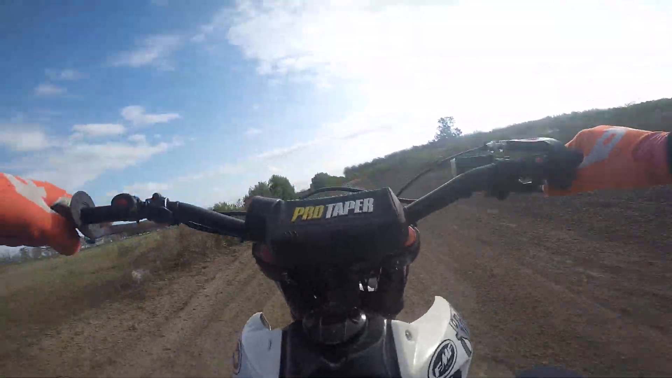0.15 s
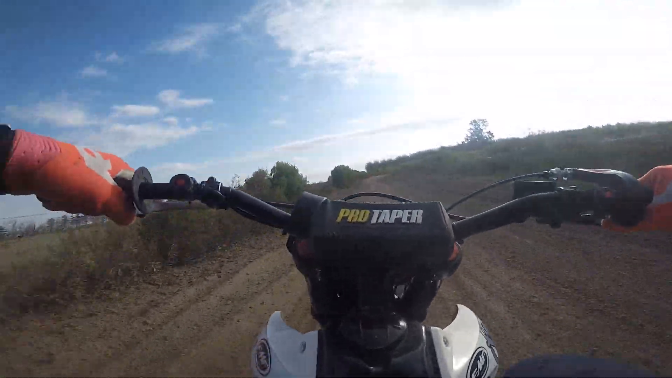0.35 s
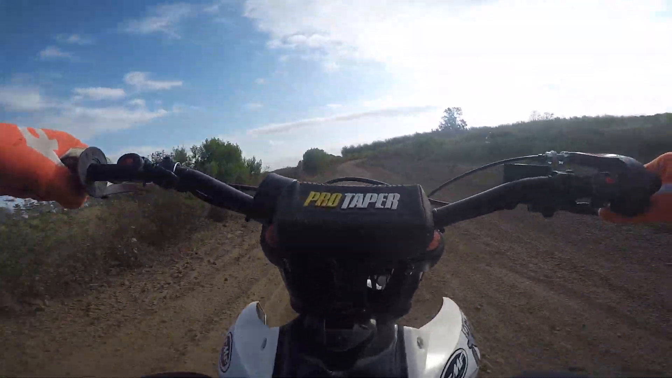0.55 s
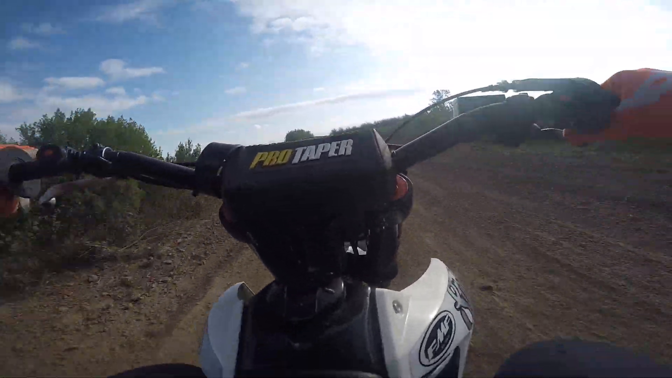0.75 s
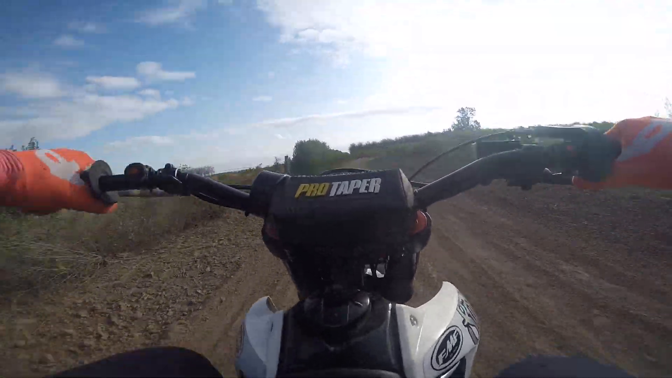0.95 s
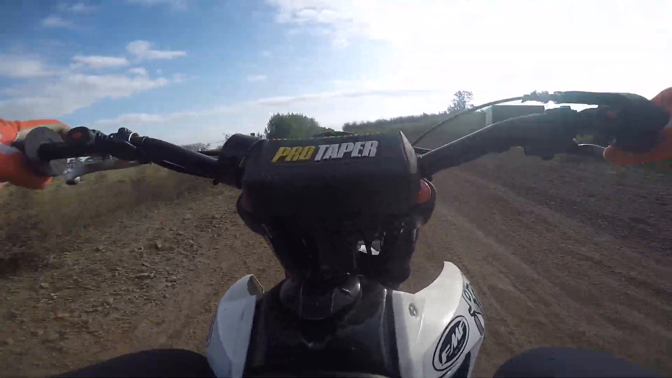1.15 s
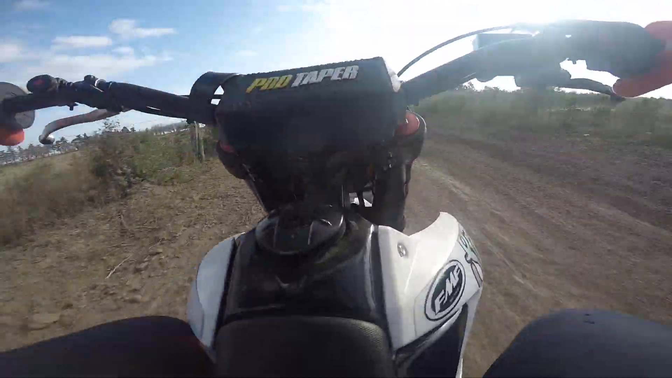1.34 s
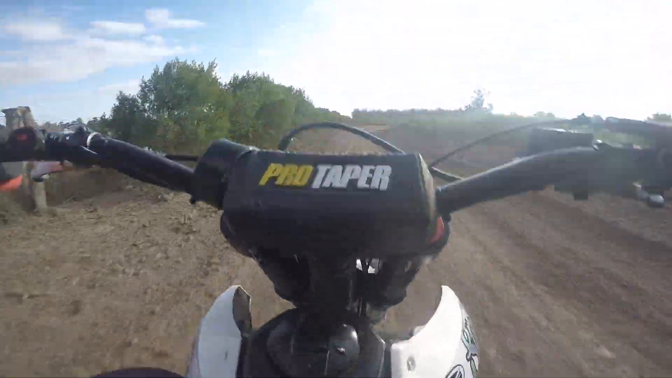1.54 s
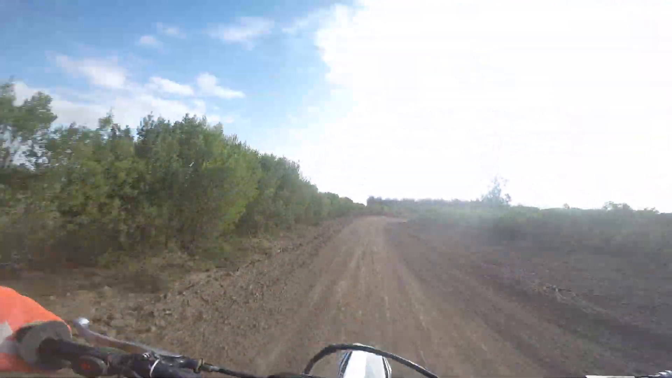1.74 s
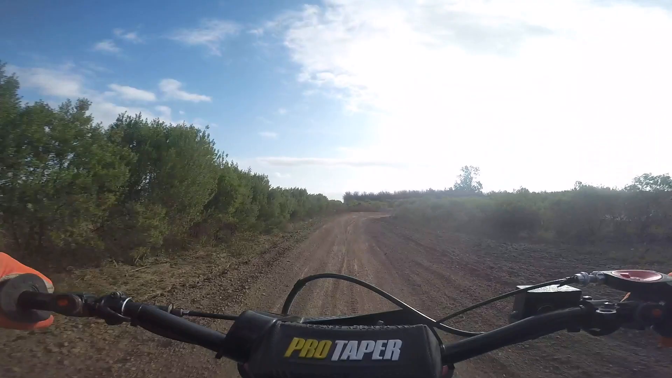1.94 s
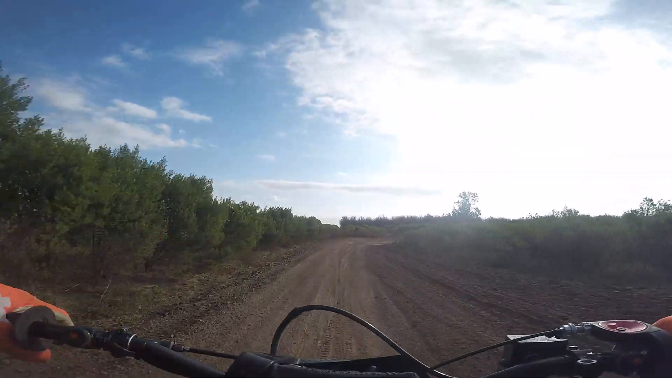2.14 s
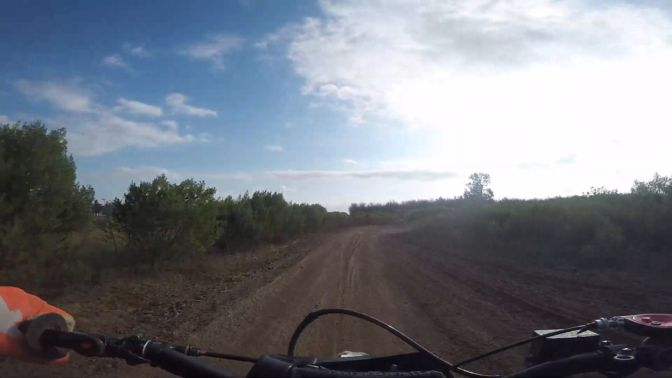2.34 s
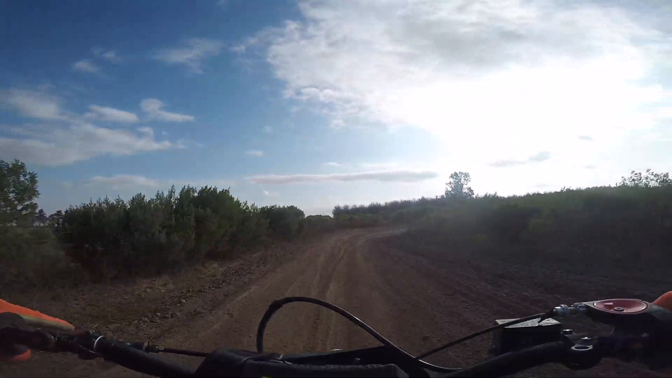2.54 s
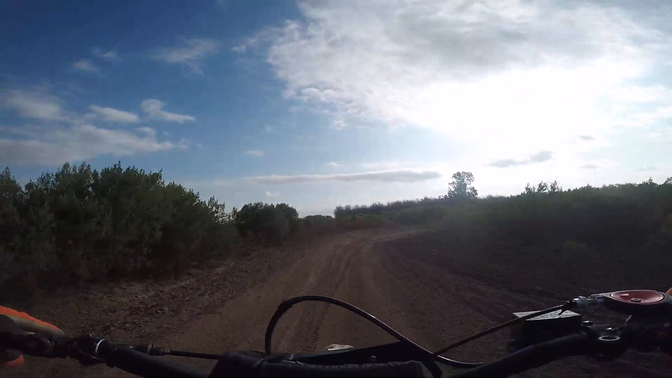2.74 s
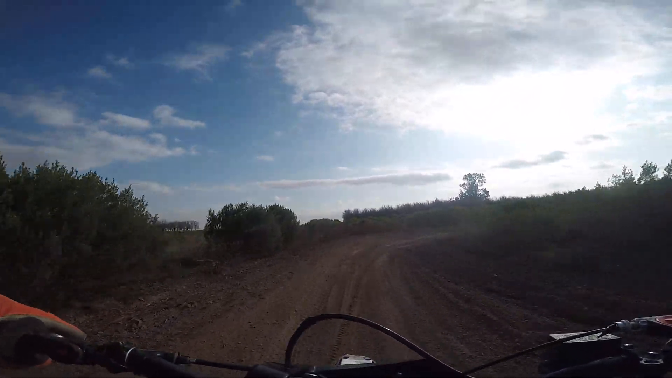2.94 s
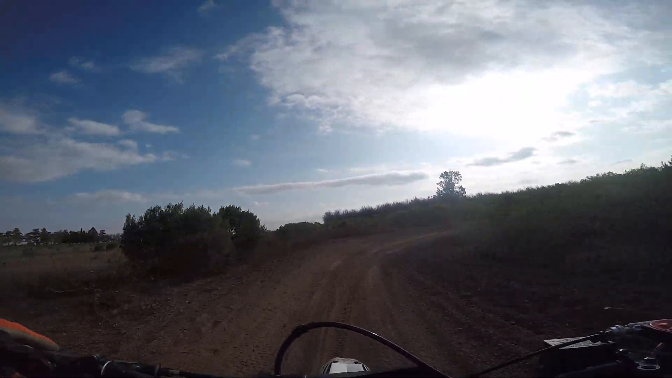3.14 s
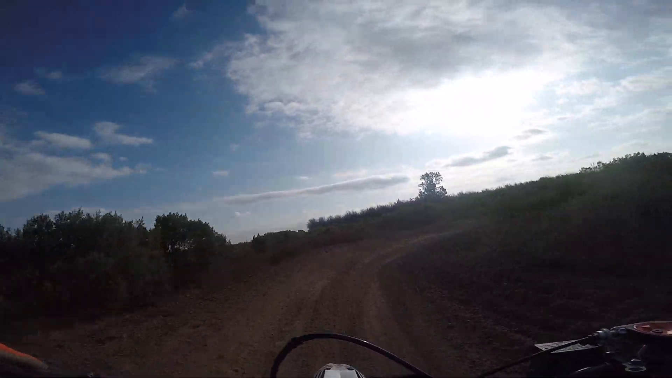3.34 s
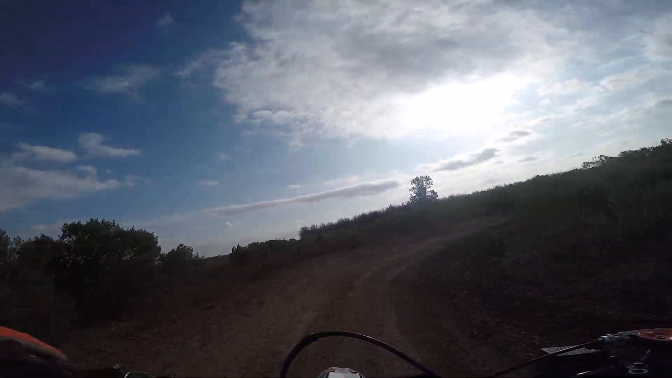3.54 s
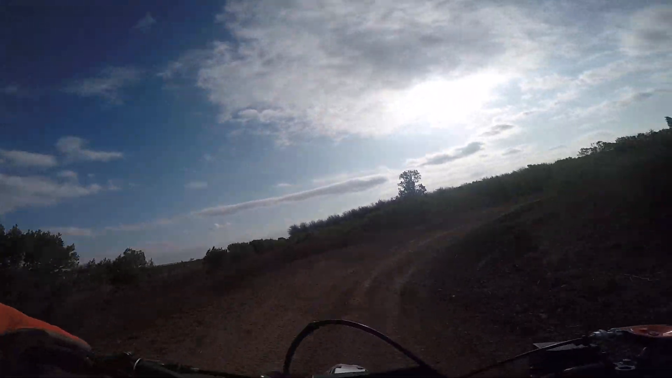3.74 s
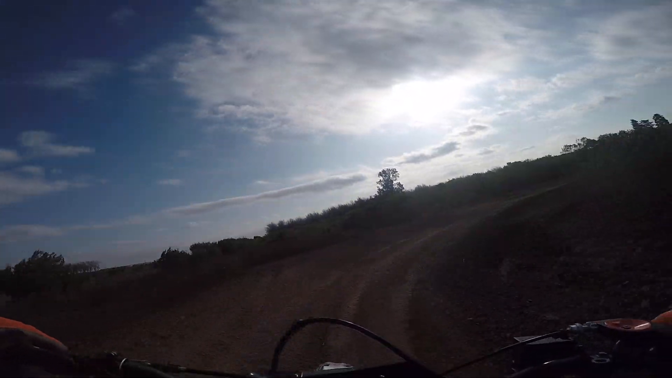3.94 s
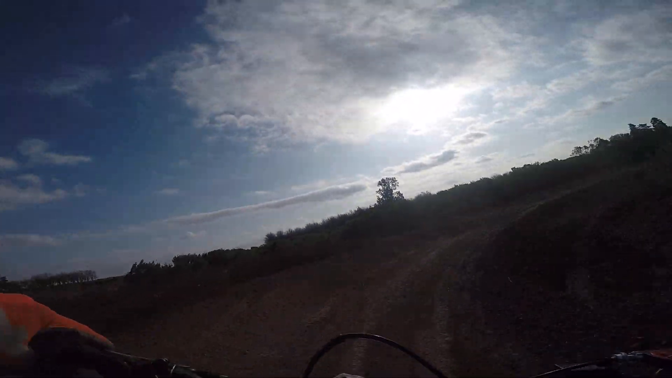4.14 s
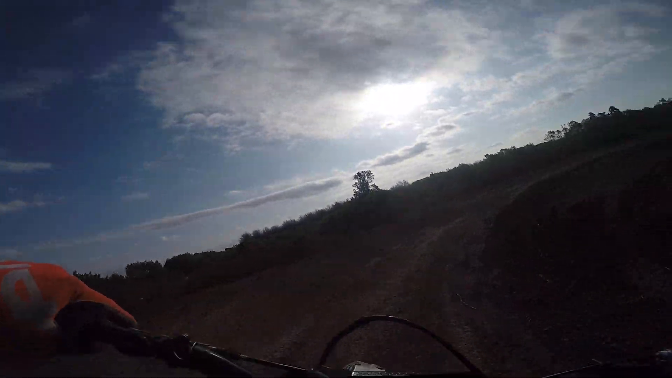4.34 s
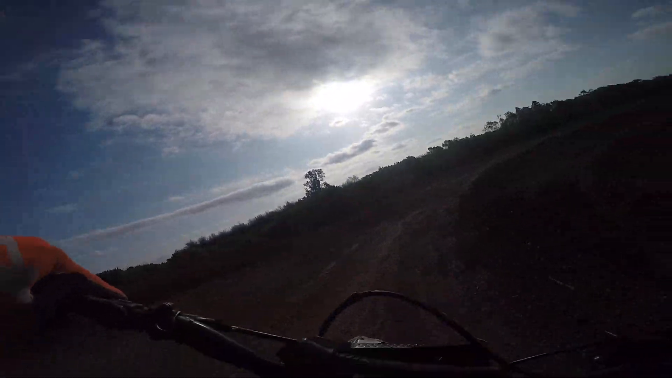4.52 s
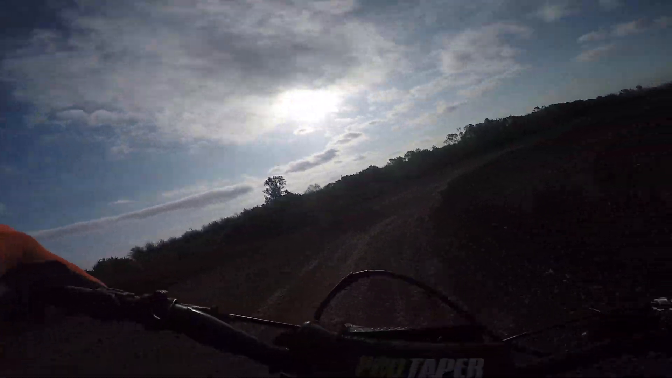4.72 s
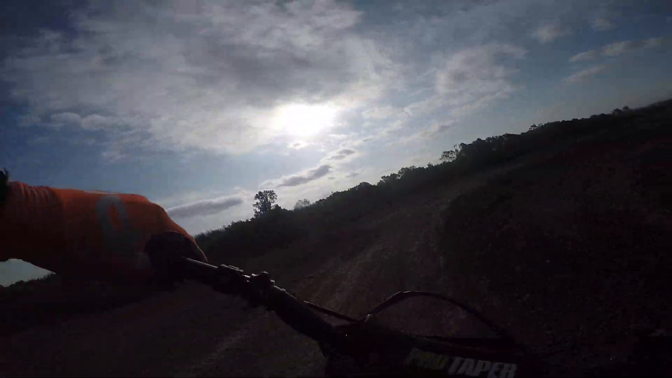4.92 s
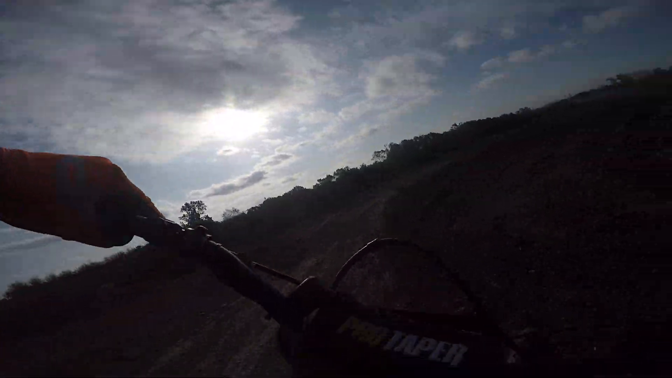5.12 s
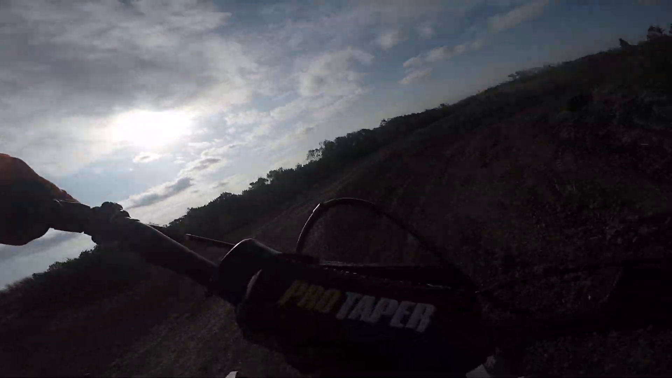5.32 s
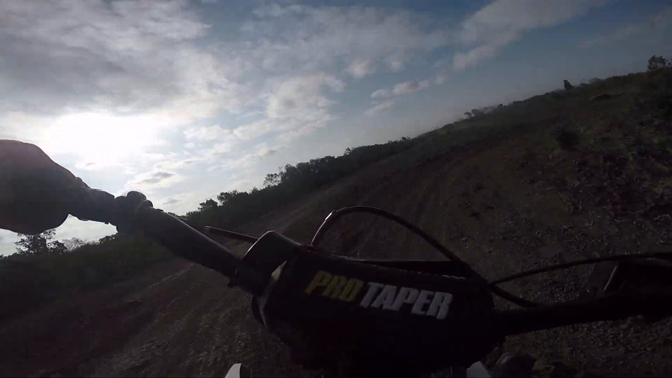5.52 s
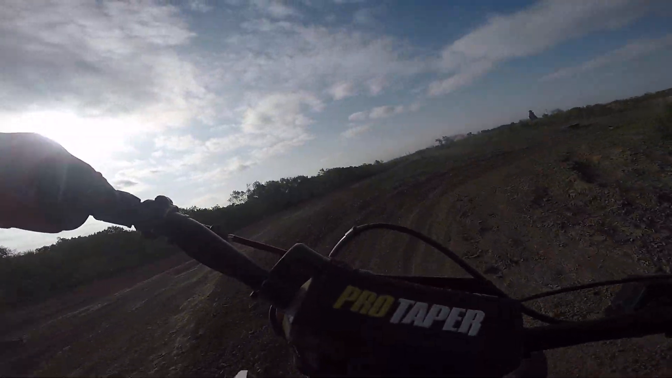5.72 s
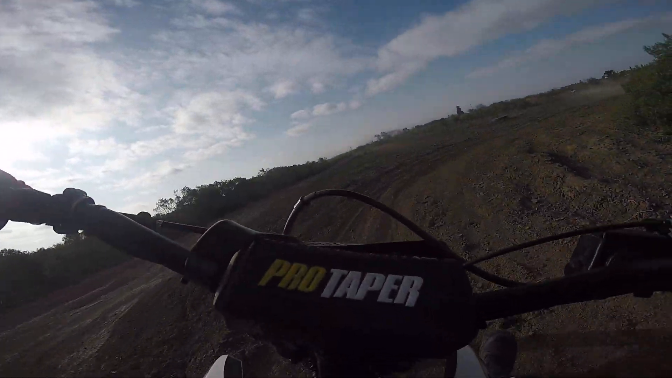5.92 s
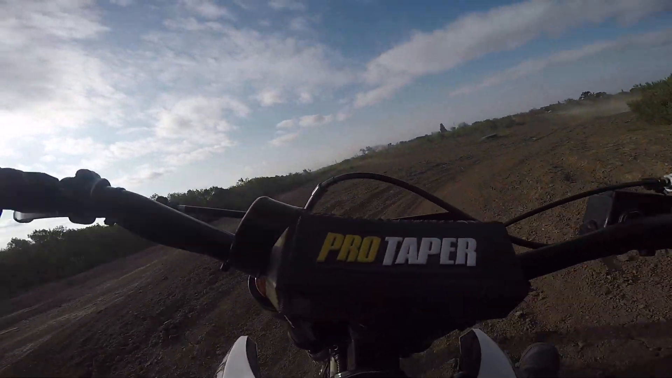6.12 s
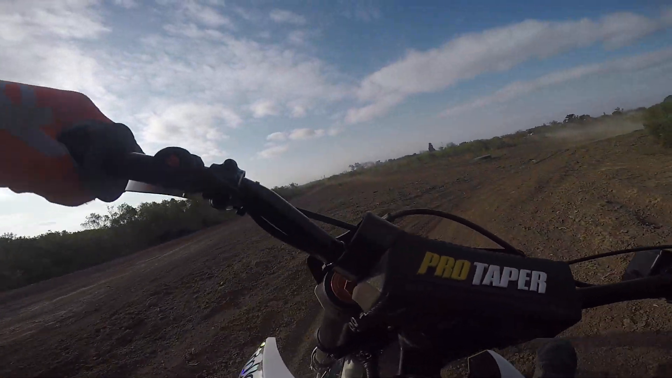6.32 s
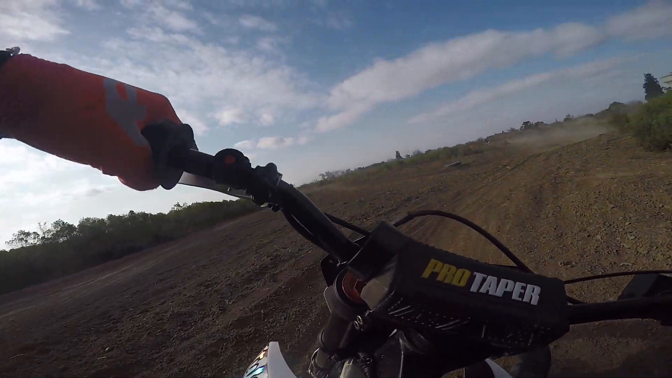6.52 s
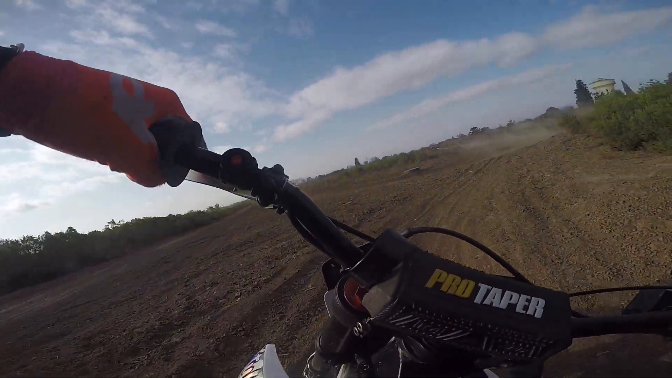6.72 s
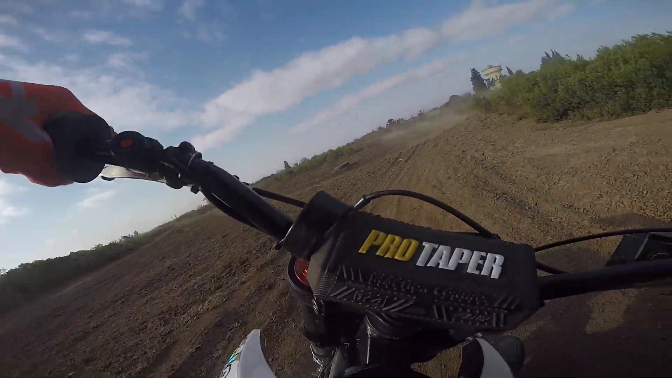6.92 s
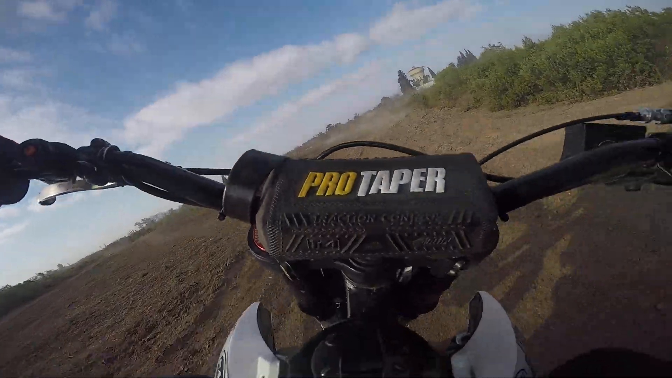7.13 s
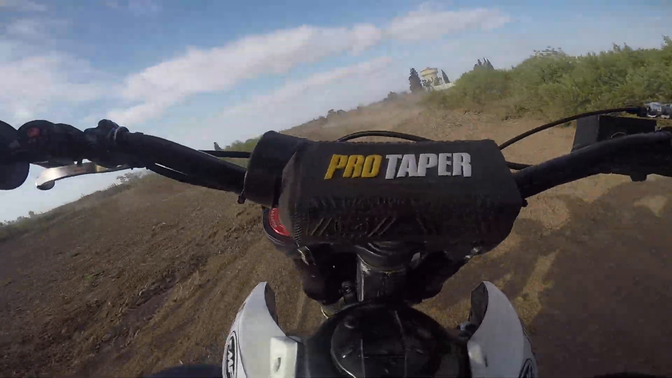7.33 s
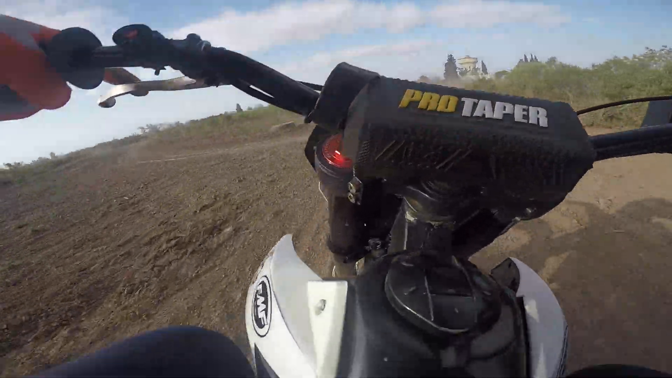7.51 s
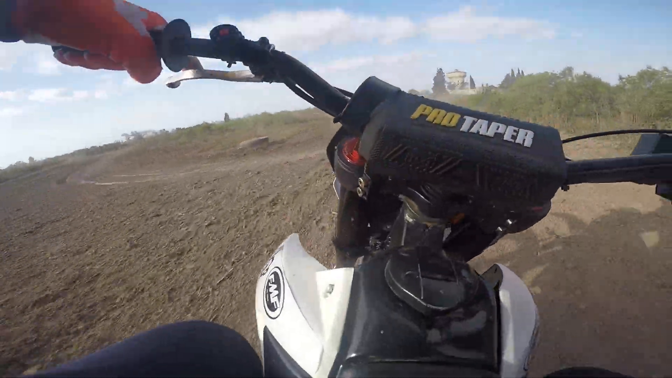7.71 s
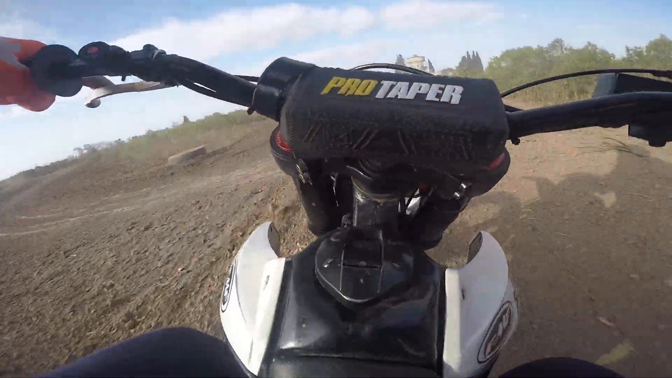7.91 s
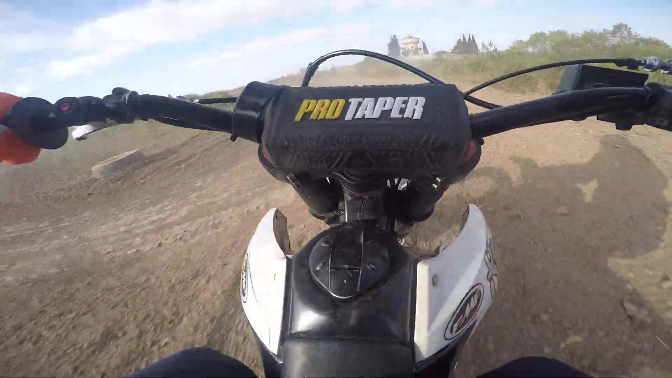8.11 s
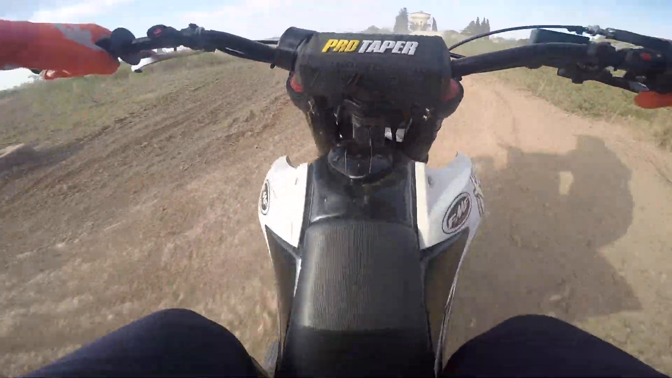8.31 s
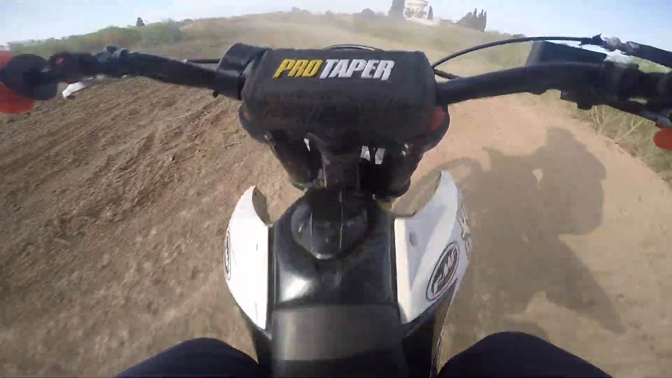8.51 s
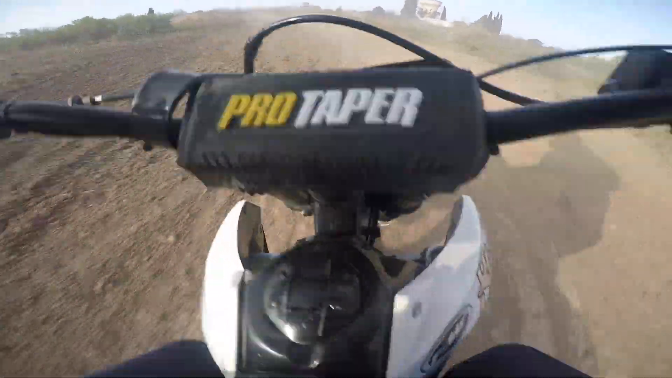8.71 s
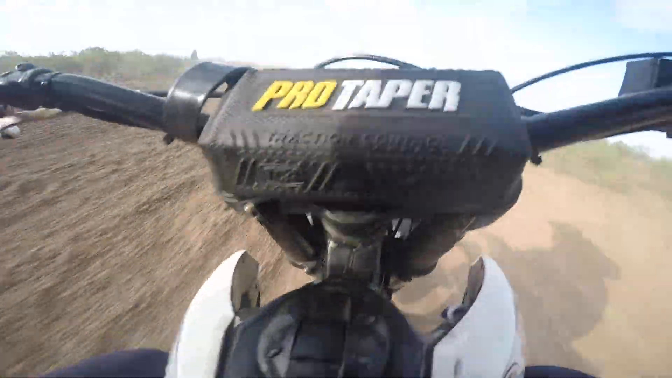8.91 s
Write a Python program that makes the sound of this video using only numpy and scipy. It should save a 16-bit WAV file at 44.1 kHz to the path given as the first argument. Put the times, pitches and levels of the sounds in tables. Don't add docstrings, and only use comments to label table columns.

```python
import sys
import numpy as np
from scipy import signal
from scipy.fft import rfft, irfft, next_fast_len
from scipy.io import wavfile
from scipy.ndimage import uniform_filter1d, map_coordinates

SR = 44100
rng = np.random.default_rng(int(sys.argv[2]) if len(sys.argv) > 2 else 0)


def amplitude_ratio(level_db):
    exponent = np.asarray(level_db, float) / 20
    return 10 ** exponent


def transcribe(u):
    v = np.clip(np.atleast_2d(u).T, -1, 1)
    q = np.round(v * 32767).astype(np.int16)
    wavfile.write(sys.argv[1], SR, q)


N = 399526

# time in seconds, firings per second.
ENGINE_SPEED = [(0, 75), (.15, 73.8), (.97, 84.3), (1.3, 74.7), (1.6, 59.4), (2.42, 48), (3.0, 43.7),
                (3.7, 31), (4.15, 15.5), (4.42, 13.7), (4.75, 27.4), (5.75, 28.5), (6.0, 30.9), (6.6, 34.3),
                (7.38, 50.4), (8.1, 68.7), (8.8, 70.5), (9.06, 80.7)]
# time in seconds, extra firings per second, rise and fall in seconds.
WHEEL_SLIPS = [(.64, 6, 0.43, .33), (1.07, 11, 0.097, 0.099), (1.17, 14, .1, .08), (2.2, 2.5, .5, .2),
               (5.1, -1.45, 0.23, 0.095), (5.35, 3, .18, .15), (7.05, 9, .35, .3), (7.47, 2, 0.0799, .3),
               (8.56, 24, .3, .08), (8.64, 24, .08, .12)]
# time in seconds, exhaust effort in dB, extra chassis shake in dB.
THROTTLE_DRIVE = [(0, -17, -0.6), (.7, -14.5, -1.5), (.88, -16.5, -1), (1.12, -14.5, -1.5),
                  (1.41, -18.5, -1.2), (1.76, -32.5, 0), (3.1, -35.5, -1.5), (3.2, -41.5, 2),
                  (3.76, -41, -2), (4.1, -50.5, -1.5), (5.1, -47.5, 2.5), (5.16, -39.5, -2), (6.61, -32, 2),
                  (6.91, -19.5, 1), (7.2, -17.5, .1), (8.4, -14, -1), (8.78, -17.5, -1),
                  (9.06, -15.5, -0.2)]
# time in seconds, share from 0 to 1.
COASTING_SHARE = [(1.35, 0), (1.75, 1), (3.4, 1), (3.6, .55), (4.6, .55), (5.1, 0)]
# time in seconds, extra roughness from 0 to 1, rise and fall in seconds.
STUMBLES = [
    (6.87, .06, .2, .2),
    (8.7, .1, .1, .15),
]
# time in seconds, lag in cycles, strength from 0 to 1.
PIPE_ECHO = [(0, 0.65, 0.33), (.4, .66, 1), (1.1, .66, 0.73), (1.4, 0.64, 0.55), (1.8, 0.28, 0.26),
             (2.6, .33, 0.47), (4.5, 0.31, 0.35), (5.15, 0.32, .6), (6.5, 0.3006, 0.4), (6.85, .36, 0.34),
             (7.1, 0.42, .4), (8.0, 0.3614, 0.49), (8.3, .37, .75), (8.55, .47, .9), (9.06, 0.4, 0.33)]
# frequency in Hz, level in dB.
PIPE_COLOUR = [(70, 0.5), (120, -5.5), (170, -8.5), (220, -1), (270, 3.5), (320, 3.5), (370, -3.5),
               (420, -15.5), (480, -15.5), (550, -19.5), (620, -25.5), (700, -34)]
# time in seconds, change in dB, rise and fall in seconds.
DEEP_SWELLS = [
    (4.24, -22, 0.19, .3),
    (4.85, 5, .3, .3),
    (7.62, 4, .5, 0.39),
    (8.92, -11, .12, .2),
    (1.303, -6, 0.14, .2),
]
# time in seconds, change in dB, rise and fall in seconds.
THROTTLE_BITES = [
    (.7, -4, .6, .35),
    (5.95, 9.5, 0.34, 1.26),
    (8.5, 4, 0.44, .3),
]
# frequency in Hz, level in dB.
OPEN_RASP = [(430, -34), (520, -1.5), (620, -3.5), (700, 3.5), (850, -3.5), (1000, -10.5), (1200, -5),
             (1500, 2.5), (2000, -34)]
# frequency in Hz, level in dB.
SHUT_RASP = [(330, -26), (480, 8), (560, 4.5), (630, 4), (720, -2), (810, -5.5), (960, -12), (1100, -15),
             (1600, -19)]
# dB at middle effort and speed,
# dB per dB of effort, dB per dB of speed, dB added when coasting.
RASP_RULE = (-42, 0.7355, -.4, 3)
BASS_RULE = (9.5, -0.3755, -1.06, 4)
EDGE_RULE = (2.5, 0.37, -1.71, -4)
CLATTER_RULE = (-27.5, 0.543, .5, 1.63)
FIZZ_RULE = (-17.5, -0.1319, 0.5, -1.4)
# frequency in Hz, dB per Hz.
PULLING_CLATTER = [(530, -28), (900, -9.5), (1040, -15), (1340, -4), (1960, 3.5), (2190, -5), (2610, 3.5),
                   (2820, 4), (3230, -17.5), (3580, 6.5), (3970, 2), (4650, -3), (5000, -8.5),
                   (5410, -21.5), (6000, -12), (7800, -94), (13200, -120)]
# frequency in Hz, dB per Hz.
COASTING_CLATTER = [(530, -6), (900, -15), (1390, -2.5), (1510, 0), (1960, 4), (2430, 0), (2530, 5),
                    (2800, 5.5), (2940, 1), (3280, -8.5), (3640, -5), (4200, 3), (4580, -6), (4960, -1),
                    (6000, -23), (7800, -72), (13200, -120)]
# frequency in Hz, dB per Hz.
FIZZ_COLOUR = [(3120, -37), (5300, -5), (6140, -10), (6740, -8.5), (7050, -4.5), (7340, -5.5), (8100, -9.5),
               (8700, -16.5), (10200, -22), (11500, -18.5), (13000, -26.5), (14200, -18.5), (15400, -30)]
# frequency in Hz, width in Hz, level in dB.
OPEN_RINGS = [(6950, 20, -8.5), (1887, 88, 12.5), (2600, 71, 7.5), (2904, 13, 14), (3760, 120, 0)]
# frequency in Hz, width in Hz, level in dB.
SHUT_RINGS = [(2553, 24, 16), (2857, 30, 14), (4890, 247, 6), (3786, 130, 8.5), (1880, 21, -5)]
# frequency in Hz, width in Hz, level in dB.
CHAIN_GUIDE_RING = [(1250, 77, 4.5)]
# start and end in seconds, teeth per cycle, level in dB.
GEAR_WHINES = [
    (0.29, 0.718, 23.3, -22),
    (1.018, 1.13, 19.8, -20),
    (4.6, 4.86, 45.5, -50),
    (7.424, 7.809, 44, -22.5),
    (7.76, 8.15, 22, -33),
    (8.397, 8.517, 19, -26),
]
# start and end in seconds, first and last level in dB.
LULLS = [
    (1.476, 1.623, -1, -1),
    (4.137, 4.18, -2, -6),
    (4.231, 4.25, -7, -8),
    (4.335, 4.361, 2, -7),
    (4.473, 4.479, -2, -3),
    (8.65, 8.8, -5.5, -1),
]
# time in seconds, level in dB.
WIND_LEVEL = [(0, -15), (.45, -18), (.58, -28), (1.11, -17), (1.21, -30), (1.35, -22.5), (1.9, -19.5),
              (4.2, -32), (4.54, -23.5), (4.87, -24), (5.35, -30.5), (6.61, -29.5), (6.75, -20),
              (7.74, -21.5), (7.85, -27), (8.6, -27), (8.81, -17), (9.06, -21)]
# frequency in Hz, dB per Hz.
WIND_COLOUR = [(10, -30), (22, -6), (45, 0), (75, -5), (130, -16), (200, -30), (600, -50), (1200, -75)]
# time in seconds, dB over rest, rise and fall in seconds.
PANEL_BUZZES = [
    (1.13, 15, .1, .12),
    (1.68, 29.5, 0.33, 0.079),
    (2.15, 11, 0.51, 0.14),
    (3.6, 11, 0.39, .12),
    (4.75, 11, .2, 0.19),
]
# time in seconds, peak in dB, frequency in Hz.
LANDINGS = [
    (1.47, -16, 60),
    (1.885, -9, 40.4),
    (5.7, -24, 54),
    (8.75, -14, 45.04),
    (8.82, -3, 38),
]
# start and end in seconds, frequency in Hz, level in dB.
PIVOT_SQUEAK = [
    (2.495, 2.524, 3820, -18),
]
# time in seconds, peak in dB, length in seconds, thud in dB.
CHAIN_KNOCKS = [(2.461, -9.5, 0.012, -16), (2.671, -22, 0.065, -11), (3.056, -33, 0.028, -10),
                (3.197, -37, 0.063, -20), (3.995, -33, 0.038, -8), (4.122, -22.5, 0.015, -16),
                (4.1795, -25.5, 0.051, -23), (4.2547, -26, 0.046, -16), (4.292, -17, 0.032, -6),
                (4.359, -19, 0.026, -16), (4.4252, -21, 0.046, -10), (4.488, -15, 0.033, -28),
                (4.545, -24.5, 0.063, -19)]

ROUGH_PULL, ROUGH_COASTING = .045, .26
MID_SPEED, MID_DB = 46, -30
LUG_SPEED = 26
FLYWHEEL_S = .06
LUG_BEAT = 1.4
LOAD_MID, LOAD_PER_DB = 0.45, 0.07
PANEL_REST_DB, PANEL_PER_DB = -54, .5
BITE_EDGE = 0.39


def unit(x):
    return x / np.sqrt(np.mean(x ** 2) + 1e-20)


def running_rms(x, samples):
    power = uniform_filter1d(uniform_filter1d(x ** 2, samples), samples)
    return np.sqrt(np.abs(power) + 1e-12)


def steady(x, span):
    return x / running_rms(x, int(span * SR))


def curves(rows):
    s, *columns = np.transpose(rows)
    return [np.interp(np.arange(N) / SR, s, c) for c in columns]


def tents(rows):
    t = np.arange(N) / SR
    return sum(np.interp(t, [s - abs(rise), s, s + abs(fall)], [0, top, 0]) for s, top, rise, fall in rows)


def wobble(rate):
    knots = rng.standard_normal(int(N * rate / SR) + 4)
    return map_coordinates(knots, [np.arange(N) * rate / SR])


def filtered(x, response):
    m = next_fast_len(N + 8192)
    return irfft(rfft(x, m) * response(np.fft.rfftfreq(m, 1 / SR)), m)[..., :N]


def colour(points):
    f, v = np.transpose(points)
    return lambda hz: amplitude_ratio(np.interp(np.log(hz + 1), np.log(f + 1), v, left=-120, right=-120))


def causal(gain):
    def response(hz):
        c = irfft(np.log(gain(hz) + 1e-5))
        c[1:len(c) // 2] *= 2
        c[len(c) // 2 + 1:] = 0
        return np.exp(rfft(c))
    return response


def modes(table):
    def response(f):
        total = 0
        for k, (hz, width, db) in enumerate(table):
            damping = 1j * f * width
            total = total + (-1) ** k * amplitude_ratio(db) * damping / (hz * hz - f * f + damping)
        return total
    return response


def blend(a, b, share):
    turn = np.clip(share, 0, 1) * np.pi / 2
    return np.cos(turn) * a + np.sin(turn) * b


def spikes(at, size):
    low = np.clip(np.floor(at).astype(int), 0, N - 2)
    part = np.clip(at - low, 0, 1)
    return np.bincount(low, size * (1 - part), N) + np.bincount(low + 1, size * part, N)


def firings(cycle, speed, rough):
    lag, strength = curves(PIPE_ECHO)
    at = np.flatnonzero(np.diff(np.floor(cycle)) > 0)
    luck = rng.standard_normal((len(at), 2))
    size = amplitude_ratio(7.8 * rough[at] * luck[:, 0])
    late = at + 0.001004 * SR * rough[at] * luck[:, 1]
    direct = spikes(late, size)
    delay = lag / np.maximum(speed, MID_SPEED) * SR
    pulses = direct + spikes(late + delay[at], size * np.clip(strength[at], 0, 1))
    ringing = direct + spikes(late + .00635 * SR, .7 * size)
    return pulses, ringing, np.interp(np.arange(N), at, size)


def exhaust(pulses, puff, rough, bark_db, bass_db, edge_db):
    source = steady(pulses, .12) + 2.5 * rough * puff
    pipe = colour([(15, -47), (40, -6.0)] + PIPE_COLOUR + [(800, -62), (1000, -90)])

    def low(f):
        return 1 / (1 + (f / 165) ** 6)

    def high(f):
        return 1 / (1 + (325 / (f + 1)) ** 12)

    bark = -filtered(source, lambda f: pipe(f) * (1 - low(f) - high(f)))
    edge = -filtered(source, lambda f: pipe(f) * high(f))
    clean = source - 1.8 * rough * puff
    bass = -filtered(clean, lambda f: pipe(f) * low(f))
    bark = bark + amplitude_ratio(edge_db + BITE_EDGE * tents(THROTTLE_BITES)) * edge
    mix = bark + amplitude_ratio(bass_db + tents(DEEP_SWELLS)) * bass
    return amplitude_ratio(bark_db) * mix / running_rms(bark, SR // 8)


def exhaust_rasp(ringing, puff, rough, lug, throttle, rasp_db):
    def rasp(response):
        hiss = (0.36 + 3 * rough) / (1 + 4 * lug) * rng.standard_normal(N)
        source = steady(ringing, 0.13) + (0.14 + 4 * rough) * puff + hiss
        return steady(filtered(source, response), 0.057)

    shut = rasp(colour(SHUT_RASP))
    wide = rasp(causal(colour(OPEN_RASP)))
    return amplitude_ratio(rasp_db + tents(THROTTLE_BITES)) * blend(shut, wide, throttle)


def clatter(cycle, size, throttle, fizz_db, load, overrun, lug):
    beat = 1 + 0.56 * np.exp(-4 * ((cycle - .05) % 1)) + .5 * np.exp(-7 * ((cycle - .55) % 1))
    uneven = amplitude_ratio(0.62 * wobble(7.9) + 0.38 * wobble(40) + 0.82 * wobble(300))
    rattle = steady(beat ** (1 + lug) * size ** 0.15 * uneven, 0.12)
    noise = rattle * rng.standard_normal((4, N))

    pattern = rng.standard_normal((60, 256))
    drift = np.arange(N) / SR * 5
    ticks = map_coordinates(pattern, [drift, cycle % 1 * 256], order=1, mode="grid-wrap")
    in_step = filtered((1 - overrun) * rattle * ticks, lambda f: 1 / (1 + (f / 2800) ** 4))
    pulling = unit(filtered(noise[1] + 1.8 * in_step, colour(PULLING_CLATTER)))
    coasting = unit(filtered(noise[0] + 0.038 * in_step, colour(COASTING_CLATTER)))

    shake = noise[2] * amplitude_ratio(2.74 * wobble(14))
    ring = blend(filtered(shake, modes(SHUT_RINGS)), filtered(shake, modes(OPEN_RINGS)), throttle)
    ring = ring + lug * filtered(shake, modes(CHAIN_GUIDE_RING))
    flicker = amplitude_ratio(1.2 * wobble(160) + 1.0 * wobble(22))
    fizz = unit(filtered(noise[3] * flicker, colour(FIZZ_COLOUR)))
    return blend(coasting, pulling, load) + ring + amplitude_ratio(fizz_db) * fizz


def whine(cycle):
    t, out = np.arange(N) / SR, np.zeros(N)
    for start, end, teeth, db in GEAR_WHINES:
        swell = np.sin(np.pi * np.clip((t - start) / (end - start), 0, 1))
        tone = np.sin(2 * np.pi * teeth * cycle + 2.3 * wobble(30))
        out += amplitude_ratio(db + 2.4 * wobble(14)) * swell * tone
    return out


def lulls():
    t, db = np.arange(N) / SR, np.zeros(N)
    for start, end, first_db, last_db in LULLS:
        db += np.interp(t, [start, end], [first_db, last_db], left=0, right=0)
    return amplitude_ratio(uniform_filter1d(db, SR // 300))


def engine():
    bark_db, shake_db = curves(THROTTLE_DRIVE)
    overrun = curves(COASTING_SHARE)[0]
    speed = uniform_filter1d(curves(ENGINE_SPEED)[0] + tents(WHEEL_SLIPS), int(FLYWHEEL_S * SR))
    effort_db = bark_db - MID_DB
    speed_db = 20 * np.log10(np.maximum(speed, LUG_SPEED) / MID_SPEED)
    state = np.array([np.ones(N), effort_db, speed_db, overrun])
    rules = np.array([RASP_RULE, BASS_RULE, EDGE_RULE, CLATTER_RULE, FIZZ_RULE])
    rasp_db, bass_db, edge_db, clatter_db, fizz_db = rules @ state

    lug = LUG_BEAT * (1 - overrun) * np.clip(MID_SPEED / speed - 1, 0, 1)
    rough = ROUGH_PULL + ROUGH_COASTING * overrun + tents(STUMBLES)
    throttle = (bark_db + 34) / 16
    load = LOAD_MID + LOAD_PER_DB * effort_db
    cycle = np.cumsum(speed) / SR + .3
    pulses, ringing, size = firings(cycle, speed, rough)
    puff = steady(np.exp(-6 * (cycle % 1)) * rng.standard_normal(N), .12)

    out = exhaust(pulses, puff, rough, bark_db, bass_db, edge_db)
    out = out + exhaust_rasp(ringing, puff, rough, lug, throttle, rasp_db)
    metal = clatter(cycle, size, throttle, fizz_db, load, overrun, lug)
    out = out + amplitude_ratio(clatter_db + shake_db) * metal
    return lulls() * out + whine(cycle)


def wind():
    lumps = amplitude_ratio(4.0 * wobble(11))
    air = filtered(rng.standard_normal(N), colour(WIND_COLOUR))
    return amplitude_ratio(curves(WIND_LEVEL)[0] - 3.5) * steady(lumps * air, 0.058)


def panel():
    effort_db = curves(THROTTLE_DRIVE)[0] - MID_DB
    buzz = filtered(rng.standard_normal(N), lambda f: modes([(467, 14, 0)])(f) ** 2)
    return amplitude_ratio(PANEL_REST_DB + PANEL_PER_DB * effort_db + tents(PANEL_BUZZES)) * unit(buzz)


def landings():
    t, out = np.arange(N) / SR, np.zeros(N)
    for s, db, hz in LANDINGS:
        swings = (t - s) * hz
        out += amplitude_ratio(db) * np.sin(2 * np.pi * swings) * np.exp(-3 * swings ** 2)
    return out


def knocks():
    t, shape, thuds = np.arange(SR // 8) / SR, np.zeros(N + SR), np.zeros(N)
    for s, db, length, thud_db in CHAIN_KNOCKS:
        start = round(s * SR)
        fade_db = 20 * (t / max(length, .005)) ** 3
        shape[start:][:len(t)] += amplitude_ratio(db - 10 - fade_db) * (1 - np.exp(-t / .0012))
        thuds[start] = amplitude_ratio(db + thud_db + 4)
    white = rng.standard_normal((2, N)) * amplitude_ratio(2.9 * wobble(270))
    rattle = unit(filtered(white[0], colour(COASTING_CLATTER)))
    rattle = rattle + amplitude_ratio(-14.0) * unit(filtered(white[1], colour(FIZZ_COLOUR)))
    return shape[:N] * rattle + filtered(thuds, modes([(280, 280, 0)]))


def squeak():
    t, out = np.arange(N) / SR, np.zeros(N)
    for start, end, hz, db in PIVOT_SQUEAK:
        arch = np.sin(np.pi * np.clip((t - start) / (end - start), 0, 1))
        swell = np.sqrt(np.clip(arch, 0, 1))
        out += amplitude_ratio(db) * swell * (np.sin(2 * np.pi * hz * t) + 0.07 * np.sin(4 * np.pi * hz * t))
    return out


def scene():
    return (engine() + wind() + panel() + landings() + knocks() + squeak())[None]


def low_pass(x):
    return signal.sosfilt(signal.butter(12, 16070, fs=SR, output="sos"), x)


def record(dry):
    soft = dry / (1 + np.abs(dry) ** 4) ** (1 / 4)
    return low_pass(soft)


dry = scene()
out = record(dry)
transcribe(out)
```